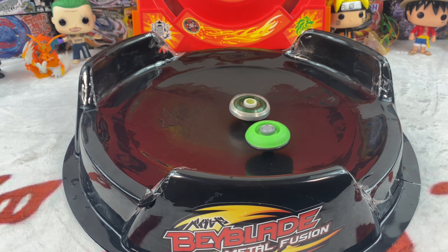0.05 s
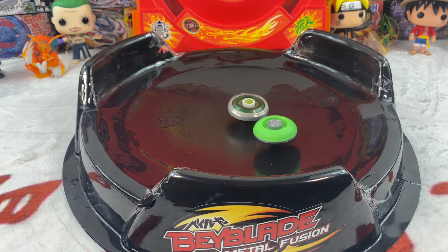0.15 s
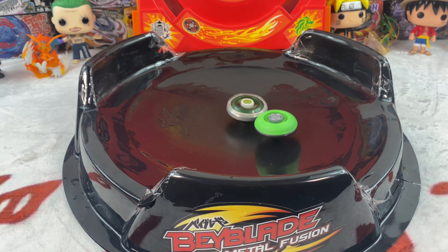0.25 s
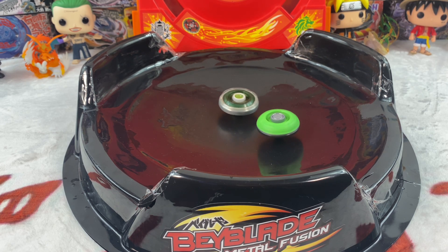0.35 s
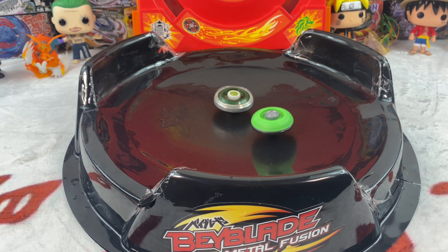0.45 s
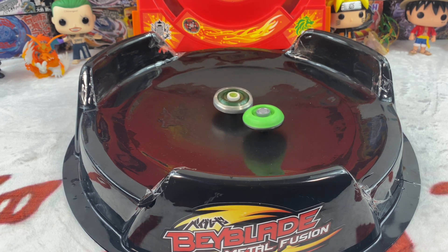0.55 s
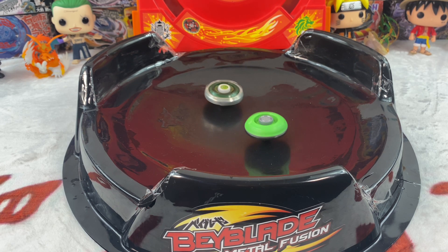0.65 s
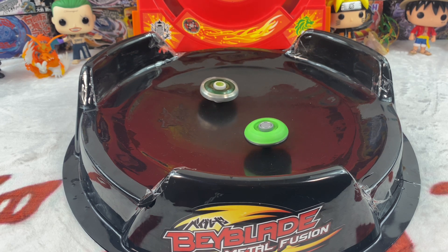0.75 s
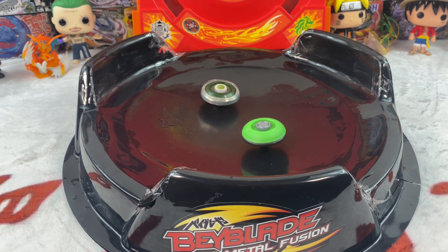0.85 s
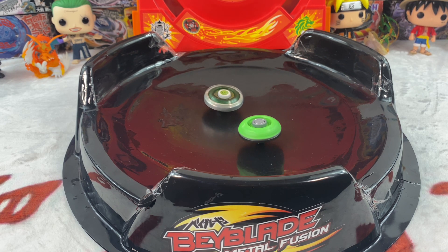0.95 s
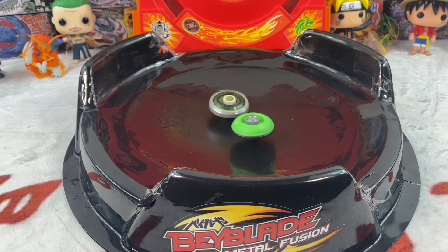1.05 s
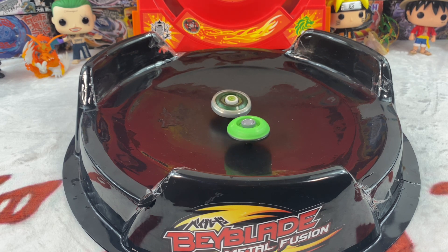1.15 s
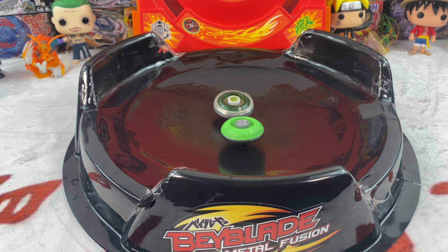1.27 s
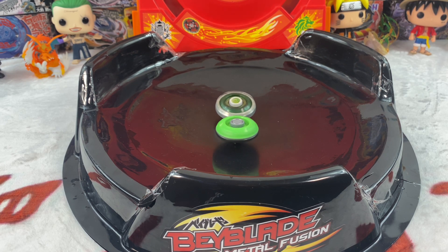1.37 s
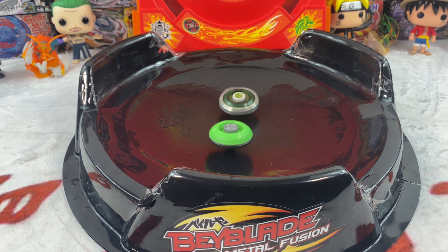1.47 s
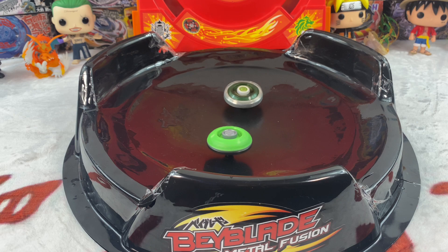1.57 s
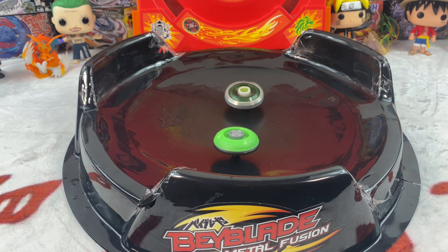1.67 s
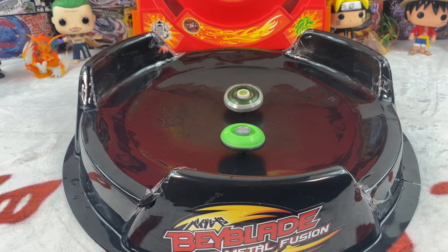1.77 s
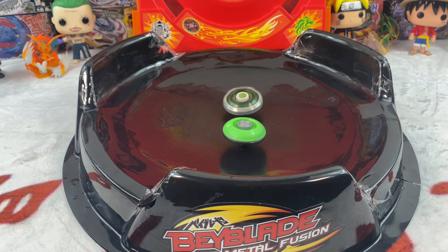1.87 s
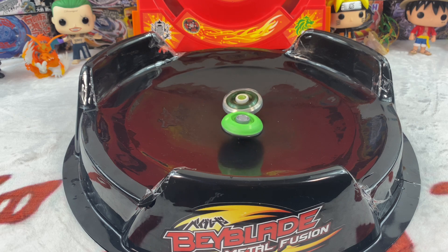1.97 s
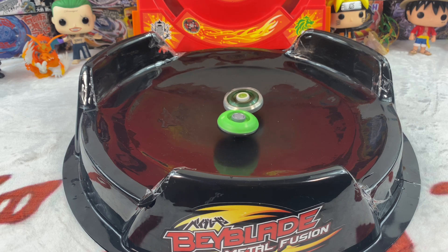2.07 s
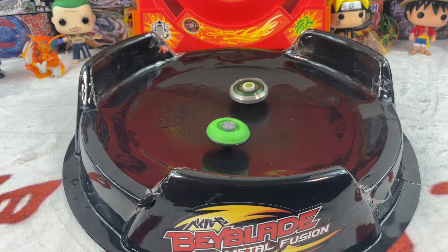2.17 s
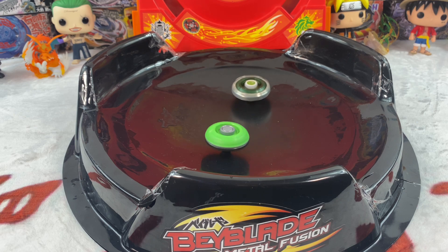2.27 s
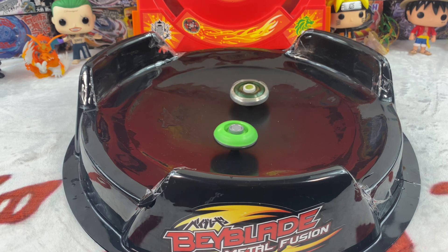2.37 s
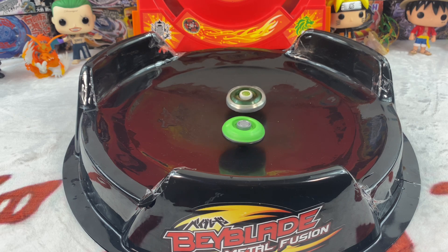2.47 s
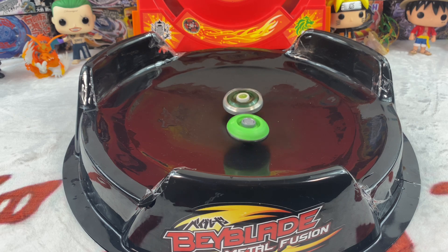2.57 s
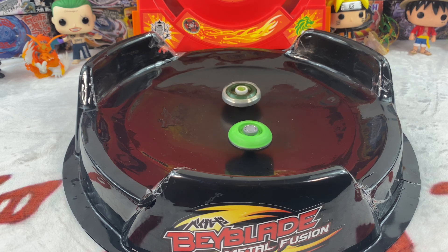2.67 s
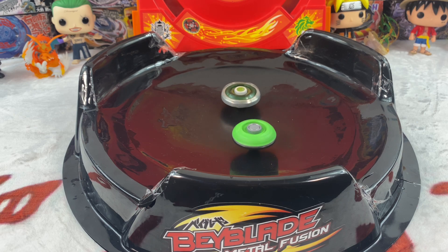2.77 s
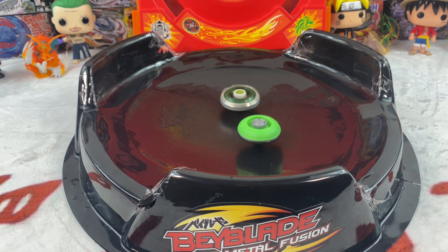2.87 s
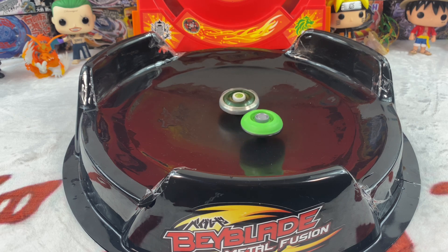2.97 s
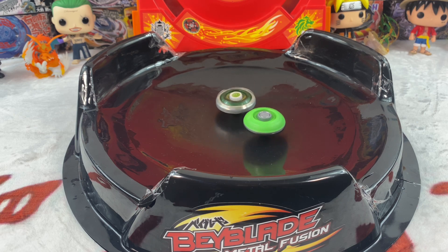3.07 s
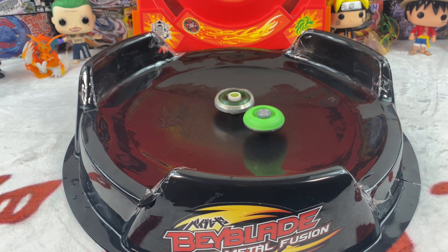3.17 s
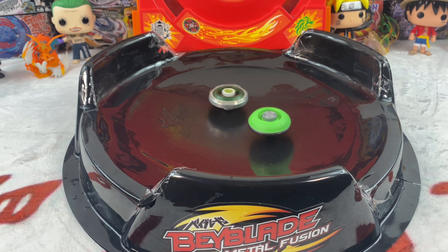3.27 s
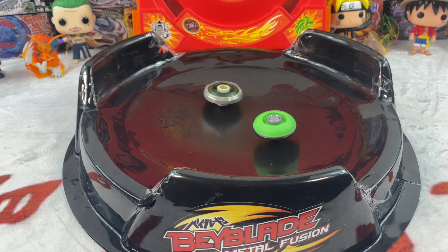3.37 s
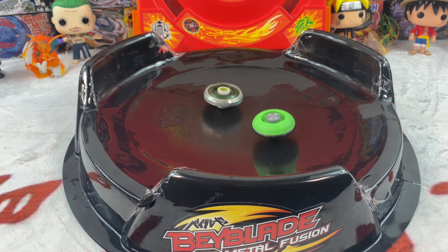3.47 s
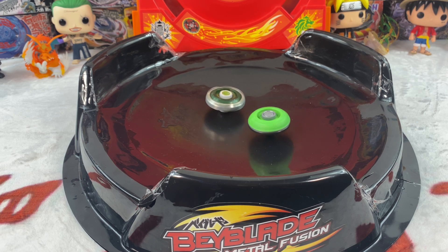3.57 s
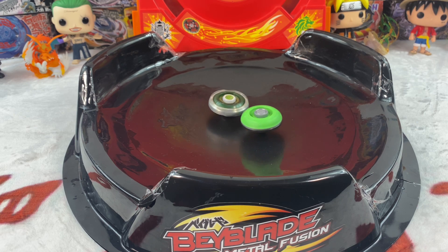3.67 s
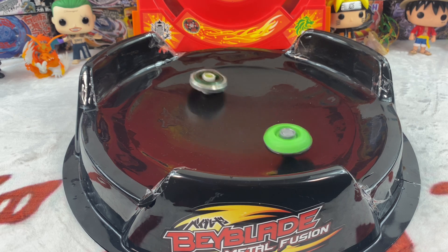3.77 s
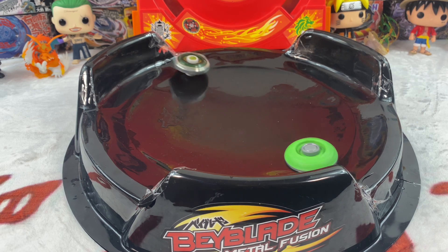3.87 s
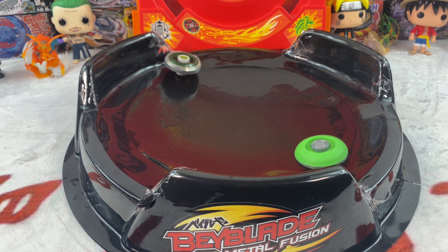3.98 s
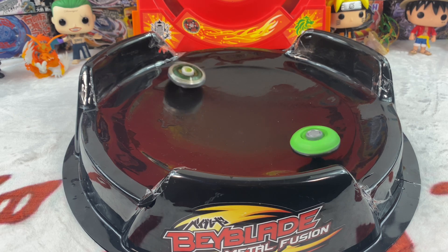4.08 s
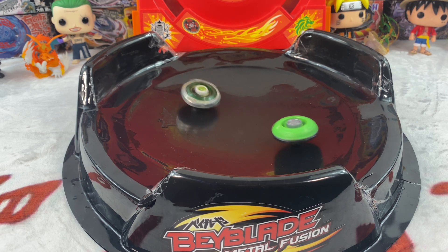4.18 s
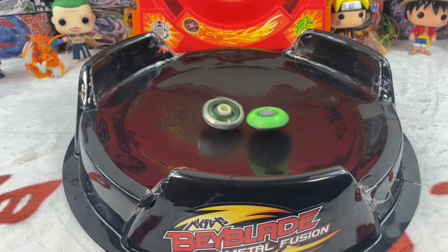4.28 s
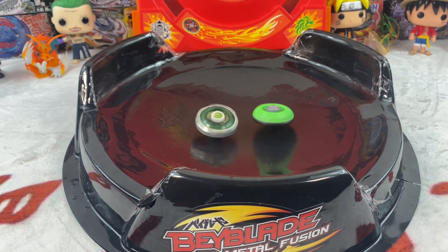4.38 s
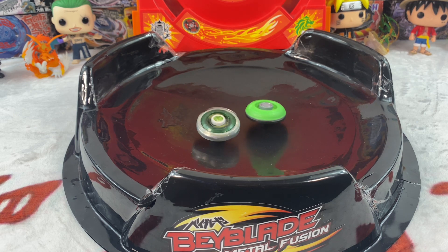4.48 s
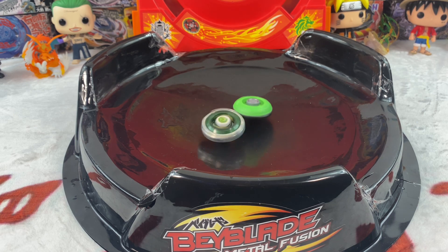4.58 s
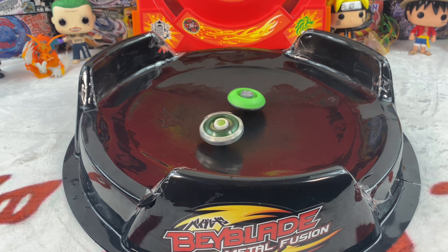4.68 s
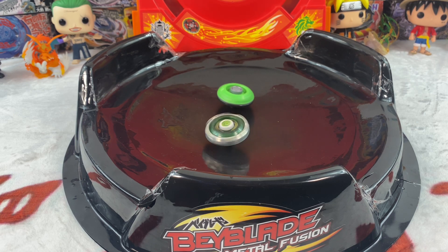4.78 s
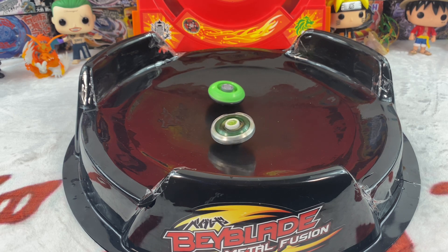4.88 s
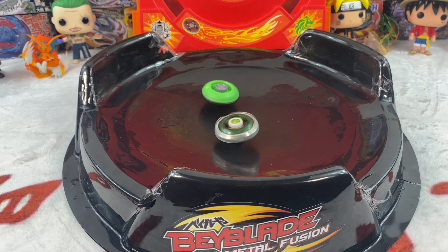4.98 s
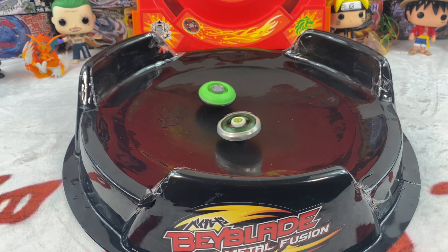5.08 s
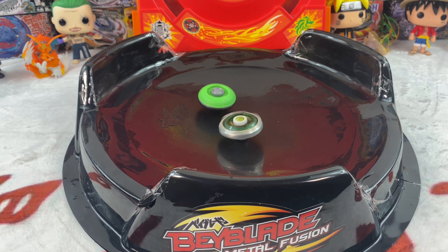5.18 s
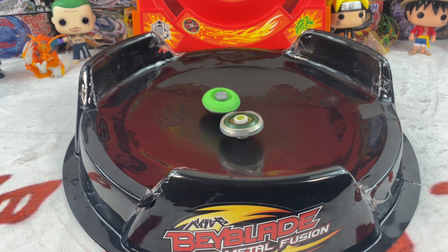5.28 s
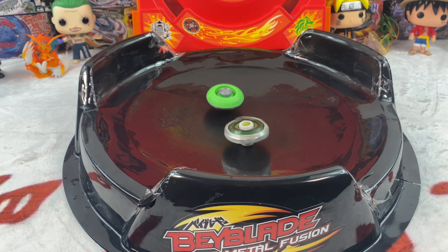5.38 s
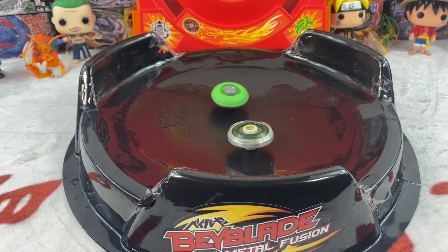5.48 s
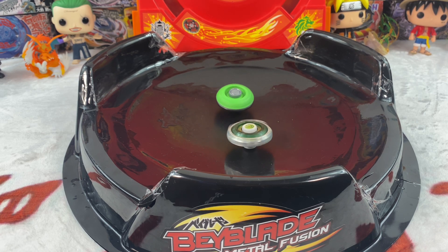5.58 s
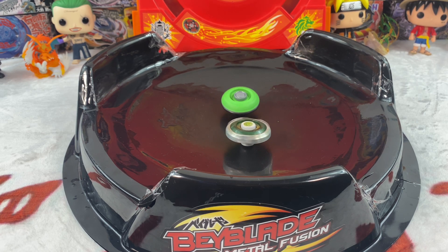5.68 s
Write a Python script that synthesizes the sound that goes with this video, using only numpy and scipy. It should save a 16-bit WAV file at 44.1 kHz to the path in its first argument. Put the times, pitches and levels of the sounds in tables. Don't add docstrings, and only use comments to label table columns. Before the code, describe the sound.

Close up in a small room, two toy spinning tops circle in a hard plastic bowl. Sharp, bright clacks, each a tiny chatter and quick rebound, come irregularly every fraction of a second. Tips skid and rumble the bowl between them. A very hard hit with a hollow falling thud comes near 3.7 seconds, then a stronger whirr and a gap before clashing resumes. Near 4.7 seconds a short run of faint scraping ticks. Quiet hiss throughout, stereo.

```python
import sys
import numpy as np
from scipy import signal
from scipy.fft import rfft, irfft, next_fast_len
from scipy.io import wavfile
from scipy.ndimage import uniform_filter1d

SR = 44100
rng = np.random.default_rng(int(sys.argv[2]) if len(sys.argv) > 2 else 0)


def convert_level_to_amplitude(level_db):
    exponent = np.asarray(level_db, float) / 20
    return 10 ** exponent


def materialize(psi):
    bounded = np.clip(np.atleast_2d(psi).T, -1, 1)
    quanta = np.round(bounded * 32767).astype(np.int16)
    wavfile.write(sys.argv[1], SR, quanta)


N = 252893

# (frequency [Hz], density [dB per Hz])
HISS_SPECTRUM = [(18, -19.5), (30, -9), (86, -10.5), (1390, -30.5), (3980, -25), (4420, -41.5), (5450, -49),
                 (11100, -41.5), (16000, -68)]
# (frequency [Hz], phase [rad], gain [dB], likeness of steady sound [0-1])
PORTS = [(0, 0, 2.5, .95), (400, -.3, 3.5, .9), (700, -.6, 0, .6), (3000, -1, -1, .5), (4500, -1.7, -2, .4),
         (6000, -2.8, 1, .2), (7000, -1, 0, .4), (8300, 2.5, -1, .3), (9200, 3.2, 0, .7),
         (13000, 9.4, 0, .9), (15200, 12.6, 0, .9)]
# (frequency [Hz], t60 [s])
ROOM_DECAY = [(500, 0.17), (1500, .45), (3500, .43), (5000, 0.4), (9000, 0.33), (15000, 0.23)]
# (frequency [Hz], level [dB])
ROOM_TINT = [(500, 3), (1500, 8.5), (2500, -6), (4000, 2.5), (6000, 0), (10000, -1), (15000, -4),
             (16000, -6.5)]
# (start [s], hold [s], push [dB], shell share [dB], grit share [dB])
SKIDS = [(0.269, .02, -47.5, -8.5, -7.5), (0.586, 0.037, -54, -4, -4.5), (1.07, 0.0068, -59, -6, -17.5),
         (1.418, 0.071, -48, -3.5, -17.5), (1.956, 0.02, -53, -10.5, -8), (2.07, 0.11, -50, -7, -13.5),
         (2.533, 0.17, -48.5, -13.5, -16), (3.01, 0.04, -51, -9, -21.5), (3.233, 0.26, -53.5, -11.5, -20.5),
         (3.711, 0.147, -43, -7.5, -16), (3.851, 0.11, -48.5, 5, -4), (3.992, 0.11, -54, 3, -4),
         (4.156, 0.18, -56.5, -13, -12.5), (4.281, 0.31, -43.5, -4, -11), (4.567, 0.056, -48, -5.5, -16),
         (4.715, 0.21, -60.5, 2, -15.5), (4.852, 0.19, -67, 2, -10.5), (5.315, 0.033, -54, -11, -3.5)]
# (rise [s], share of the hold [0-1], release [dB/s], calm level [dB])
SKID_ANSWER = [
    (0.1, 0.54, 128, -69),
    (0.053, 0.34, 162.5, -76),
    (.012, .6, 218, -83),
]
# (frequency [Hz], width [Hz], level [dB])
BOOM = [(53, 4.8, 3), (78, 14, 3.5), (93, 15, -2)]
# (frequency [Hz], width [Hz], level [dB])
SHELL = [(150, 63, -1.5), (216, 98, 1), (259, 25, 1.5), (298, 23, 7.5), (396, 23, -6.5)]
# (frequency [Hz], width [Hz], level [dB])
GRIND = [(600, 750, -14), (894, 270, 9.5), (1140, 310, 7.5), (1540, 230, 1.5), (2600, 5200, -1.5)]
# (frequency [Hz], width [Hz], level [dB])
WHIRR = [(3000, 560, -20), (4400, 320, 0), (4750, 350, -6), (5900, 1500, -14), (7000, 700, -13),
         (9325, 4000, -14), (10400, 700, -15)]
# (time [s], level [dB])
BITES = [(4.635, -8), (4.67, -2), (4.709, -3), (4.746, -4), (4.783, -8.5), (4.824, -10.5)]
# (time [s], level [dB], start [Hz], end [Hz], t60 [s])
BOWL_NOTES = [
    (1.982, -57.5, 965, 927, 0.23),
    (2.055, -67, 890, 924, 0.46),
    (3.709, -36.5, 377, 65.6, 0.084),
]
# (time [s], spin [turns/s], wheel looseness [dB])
FAST_TOP = [(0, 54.6, -86.5), (.28, 54, -74.5), (.6, 52.5, -66), (1.4, 50.8, -74.5), (1.9, 59, -77),
            (2.45, 48, -73.5), (3.55, 90, -68), (3.95, 51, -54.5), (4.05, 59, -78.5), (4.17, 42, -63),
            (4.28, 38, -58), (4.55, 38, -66), (4.9, 41, -77), (5.1, 36, -84.5), (5.22, 29, -71.5),
            (5.73, 40, -69)]
# (frequency [Hz], level [dB], t60 [s])
RIM = [(840, -7.5, 0.0028), (1134, 1.5, 0.02), (1750, -1.5, 0.024)]
CAP = [(2260, -12, 0.017), (2545, -7.5, 0.02), (2784, 1, 0.026), (3000, -2.5, 0.0039), (3150, 3.5, .008),
       (3880, -3.5, 0.0027)]
WHEEL = [(4187, -12, 0.01), (4494, -5.5, 0.019), (4760, -0.5, 0.029), (4950, -1.5, .012),
         (5062, -10, 0.0047)]
OVERTONE = [(5560, 2.5, 0.009), (5910, 0.5, 0.015), (6190, 0.5, 0.014), (6580, -4, 0.013),
            (6940, -8.5, 0.0028), (8420, -14, 0.0085), (7870, -9, 0.01)]
EDGE = [(9770, -3.5, 0.015), (10610, 0.5, 0.0045), (11320, -2.5, 0.0033), (12080, 0, 0.0022),
        (12800, -3, 0.0056), (13150, -10.5, .004), (14230, -8.5, .006)]
FAMILY_DB = [-6.5, -0.5, 2.5, 4, 1.5]
# (frequency [Hz], width [Hz], level [dB])
MAIN_MODE = [(4775, 110, 0)]
# (time [s], strength [dB], plastic share [dB], wheel ring [dB], floor echo [dB])
CLASHES = [(0.2879, 5.5, -4.5, -2.5, -12.5), (0.5999, 9, -11.5, -3.5, -7.5), (1.1025, 3.5, -9.5, 1, -9),
           (1.4406, 5.5, -5.5, -3.5, -21.5), (1.9769, 4, -9.5, 5, -16), (2.0513, -6, 0, -4.5, -14),
           (2.1059, 1.5, -8.5, -2, 4), (2.5681, 6.5, -5, 1.5, -8), (3.0337, 3.5, -3.5, -2.5, -5.5),
           (3.2371, 4.5, -6.5, 2.5, -6), (3.708, 7.5, -12, -5.5, -5.5), (4.3126, 7.5, -14.5, -3, -5.5),
           (4.5999, -0.5, 0, -2, -9.5), (5.3384, 3, -8.5, -1.5, -1)]
# (time [s], strength [dB], plastic share [dB], wheel ring [dB])
EXTRA_TEETH = [(0.2991, -17.5, 2, 0.5), (1.1041, -4, -3, 4), (1.4445, 0, -21, 0.5), (2.1073, 3, -4.5, 0.5),
               (3.235, -4.5, -12, -9.5), (4.0126, -45.5, -6.5, 2.5), (4.0696, -47, -7, 8.5),
               (4.3151, 3, -8, -14.5), (4.323, -7.5, -12.5, -3), (5.3391, -22.5, 0.5, 2),
               (5.3414, 6, -7, -4.5), (5.3508, -11.5, 4, 1)]


def evened(x):
    return x / np.sqrt(np.mean(x ** 2) + 1e-20)


def read(points, hz):
    f, value = np.transpose(points)
    return np.interp(np.log(hz + 1), np.log(f + 1), value)


def along(rows):
    s, *columns = np.transpose(rows)
    return [np.interp(np.arange(N) / SR, s, column) for column in columns]


def resonances(x, peaks):
    out = np.zeros(x.shape)
    for hz, width, db in peaks:
        pole = np.exp((2j * np.pi * hz - np.pi * 1.5 * width) / SR)
        out += convert_level_to_amplitude(db) * signal.lfilter([(1 - abs(pole)) ** 2], np.poly([pole, pole]), x).real
    return evened(out)


def to_right(x):
    size = next_fast_len(N + 512)
    hz = np.fft.rfftfreq(size, 1 / SR)
    f, phase, db, _ = np.transpose(PORTS)
    turned = np.exp(1j * np.interp(hz, f, phase))
    return irfft(rfft(x, size) * convert_level_to_amplitude(np.interp(hz, f, db)) * turned, size)[:N]


def ports(same, other):
    hz = np.fft.rfftfreq(N, 1 / SR)
    f, _, _, like = np.transpose(PORTS)
    like = np.clip(np.interp(hz, f, like), 0, 1)
    blend = like * rfft(same) + np.sqrt(1 - like ** 2) * rfft(other)
    return np.array([same, to_right(irfft(blend, N))])


def hiss():
    spectrum = rfft(rng.standard_normal((2, N))) * convert_level_to_amplitude(read(HISS_SPECTRUM, np.fft.rfftfreq(N, 1 / SR)))
    return convert_level_to_amplitude(-75) * evened(irfft(spectrum, N))


def room(x):
    out = np.zeros((2, N))
    turn = np.arange(N) / SR * 43
    for k in range(3):
        noise = rng.standard_normal((2, SR // 2))
        hz, t, bands = signal.stft(noise, SR, nperseg=128)
        decay_db = -60 * t / read(ROOM_DECAY, hz)[:, None] + read(ROOM_TINT, hz)[:, None]
        decay_db = decay_db + 6 * np.exp(-t / 0.012)
        tail = signal.istft(bands * convert_level_to_amplitude(decay_db), SR, nperseg=128)[1][:, :SR // 2]
        tail *= np.clip((np.arange(SR // 2) / SR - .0008) / 0.001, 0, 1)
        share = np.sqrt(2 / 3) * np.cos(2 * np.pi * (turn + k / 3))
        out += signal.fftconvolve((x * share)[None], tail / np.linalg.norm(tail[0]), axes=1)[:, :N]
    return ports(*out)


def skids():
    t = np.arange(0, N / SR, .002)
    start, hold, push_db, shell_db, grit_db = np.transpose(SKIDS)[:, :, None]
    levels = []
    for share_db, (rise, part, fall_db, calm_db) in zip((0, shell_db, grit_db), SKID_ANSWER):
        wander = evened(uniform_filter1d(rng.standard_normal(len(t)), size=50))
        calm = convert_level_to_amplitude(calm_db + 1.8 * wander)
        after = np.maximum(t - start - rise - part * hold, 0)
        skid = np.clip((t - start) / rise, 0, 1) ** 2 * convert_level_to_amplitude(push_db + share_db - fall_db * after)
        levels.append(np.sqrt((skid ** 2).sum(0) + calm ** 2))
    return along(np.transpose([t, *levels]))


def rolling(fast_turns):
    boom, shell, grind = skids()
    whirr_db = along(FAST_TOP)[-1]
    grit = rng.standard_normal((4, 2, N))
    lumps = convert_level_to_amplitude(3.5 * evened(uniform_filter1d(rng.standard_normal(N), 300)))
    tick_sizes = convert_level_to_amplitude(3 * np.clip(rng.standard_normal(400), -3, 1.3))
    tick_size = tick_sizes[fast_turns.astype(int)]
    ticking = grit[3] * (1 + 1.3 * tick_size * np.exp(-(fast_turns % 1) / .2))
    bowl = boom * resonances(grit[0], BOOM)
    bowl += shell * resonances(grit[1], SHELL)
    bowl += grind * resonances(grit[2] * lumps, GRIND)
    whirr = convert_level_to_amplitude(whirr_db) * resonances(ticking, WHIRR)
    return ports(*(bowl + whirr))


def wobble():
    bites = np.zeros(N)
    s, db = np.transpose(BITES)
    bites[(s * SR).astype(int)] = convert_level_to_amplitude(db)
    scrape_level = signal.fftconvolve(bites, np.exp(-np.arange(2000) / SR / 0.013))[:N]
    scrape = scrape_level * rng.standard_normal(N)
    sound = convert_level_to_amplitude(-76) * resonances(scrape + 6 * bites, GRIND) + convert_level_to_amplitude(-74) * resonances(bites, SHELL)
    return np.array([sound, to_right(sound)])


def spin():
    rate, t = along(FAST_TOP)[0], np.arange(N) / SR
    start_db, calm_db, settle_s, sag_db_per_s = -54, -71, .3, 1.5
    db = calm_db - sag_db_per_s * t + (start_db - calm_db) * np.exp(-t / settle_s)
    turns = np.cumsum(rate) / SR
    orders = np.arange(1, 23)
    order_db = np.log10(orders) * (-31 + 4 * rng.standard_normal(len(orders)))
    hum = np.zeros(N)
    for order, level_db in zip(orders, order_db):
        hum += convert_level_to_amplitude(level_db) * np.sin(2 * np.pi * (order * turns + rng.random()))
    hum = convert_level_to_amplitude(db) * evened(hum)
    return turns, np.array([hum, to_right(hum)])


def bowl_notes():
    out, t = np.zeros(N + SR), np.arange(SR // 4) / SR
    for s, db, start_hz, end_hz, t60 in BOWL_NOTES:
        hz = end_hz + (start_hz - end_hz) * np.exp(-t / 0.006)
        tone = np.sin(2 * np.pi * np.cumsum(hz) / SR)
        attack = 1 - np.exp(-t / 0.0011)
        out[round(s * SR):][:len(t)] += convert_level_to_amplitude(db - 60 * t / t60) * tone * attack
    return out[:N]


def contact(family_db, luck, chatter_s):
    t = np.arange(1800) / SR
    u = t[:300] / chatter_s
    chatter = u * np.exp(-u) * luck[:300] * abs(luck[300:600])
    out = 0
    for db, family in zip(family_db, (RIM, CAP, WHEEL, OVERTONE, EDGE)):
        hz, share_db, t60 = np.transpose(family)[:, :, None]
        hz = hz * (1 + .006 * luck[600:600 + len(hz), None])
        modes = convert_level_to_amplitude(-60 * t / t60) * np.sin(2 * np.pi * hz * t)
        rings = signal.fftconvolve(modes, chatter[None], axes=1)
        rings = (convert_level_to_amplitude(share_db) * rings / np.linalg.norm(rings, axis=1, keepdims=True)).sum(0)
        low_cut = signal.butter(6, .92 * family[0][0], "high", fs=SR, output="sos")
        rings = signal.sosfilt(low_cut, rings)
        out = out + convert_level_to_amplitude(db) * rings / np.linalg.norm(rings)
    return out


def all_round(sound):
    smooth = uniform_filter1d(abs(rfft(sound)) ** .5, size=27) ** 2
    return np.roll(irfft(smooth, len(sound)), shift=100)


def clashes():
    out = np.zeros((3, N + SR))
    first = [row[:-1] for row in CLASHES]
    again = [(s + .0058, db + back_db - 1, plastic - 2.5, wheel + 2.5)
             for s, db, plastic, wheel, back_db in CLASHES]
    rows = first + again + EXTRA_TEETH
    lucks = rng.standard_normal((len(rows), 620))
    for k, ((s, db, plastic, wheel), luck) in enumerate(zip(rows, lucks)):
        shares = [-24 + .55 * plastic, plastic, wheel, -1 + .34 * plastic, 0]
        chatter_s = .0005 if k < len(first) else .001
        sound = contact(db + np.add(shares, FAMILY_DB), luck, chatter_s)
        at = round(s * SR)
        out[:2, at:at + len(sound)] += [sound, all_round(sound)]
        out[-1, at] += convert_level_to_amplitude(db + 1.6 * wheel)
    return out[:, :N]


def scene():
    hits, spread, strikes = clashes()
    near = hits + bowl_notes()
    spread = spread + convert_level_to_amplitude(-6) * spread.std() * resonances(strikes, MAIN_MODE)
    turns, hum = spin()
    direct = np.array([near, to_right(near)])
    reverb = room(convert_level_to_amplitude(-11) * spread + convert_level_to_amplitude(-18) * hits)
    return direct + reverb + hum + rolling(turns) + hiss() + wobble()


def top_cut(x):
    return signal.sosfilt(signal.butter(12, 17010, fs=SR, output="sos"), x)


def record(dry):
    thin = signal.sosfilt(signal.butter(4, 46, "high", fs=SR, output="sos"), dry)
    limited = thin / (1 + abs(thin / .9) ** 4) ** .25
    edge = signal.firwin(61, 15700, window=("kaiser", 6), fs=SR)
    mix = signal.oaconvolve(limited, edge[None], "same")
    return top_cut(mix)


dry = scene()
out = record(dry)
materialize(out)
```